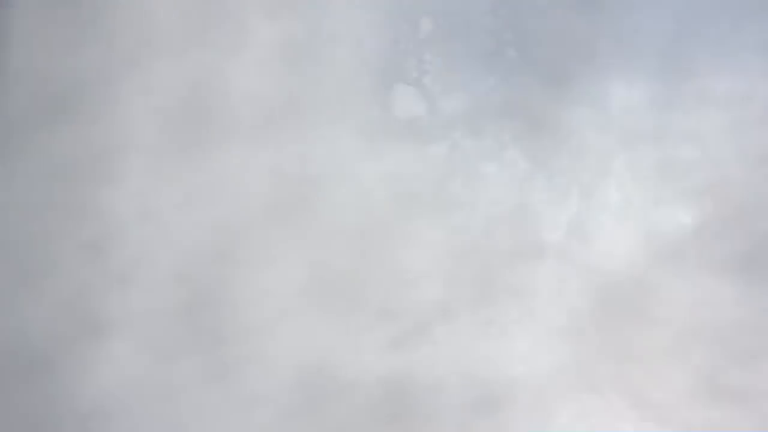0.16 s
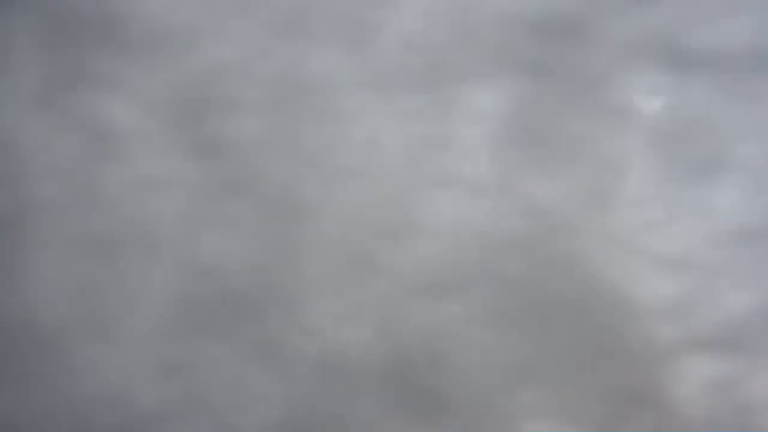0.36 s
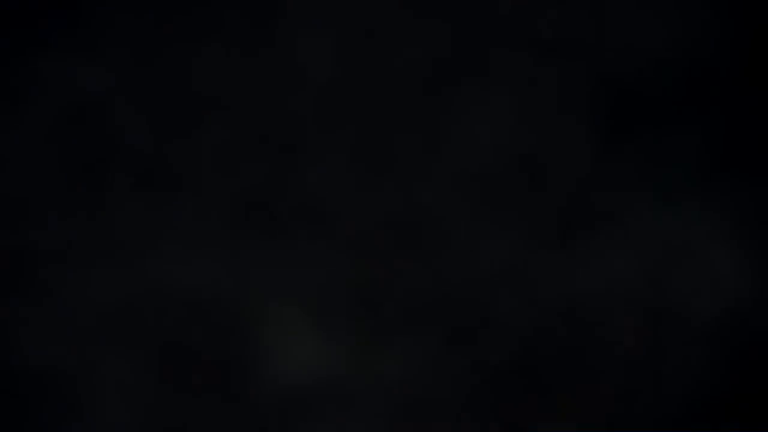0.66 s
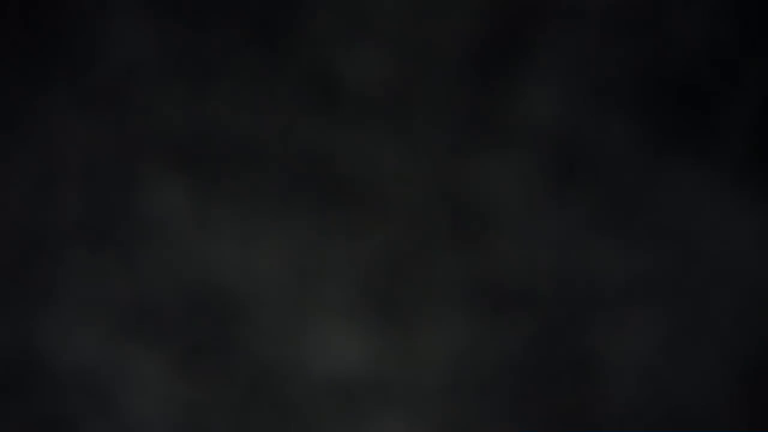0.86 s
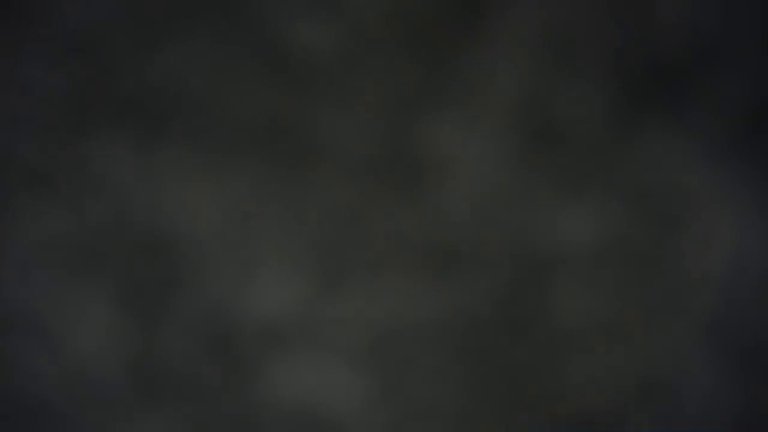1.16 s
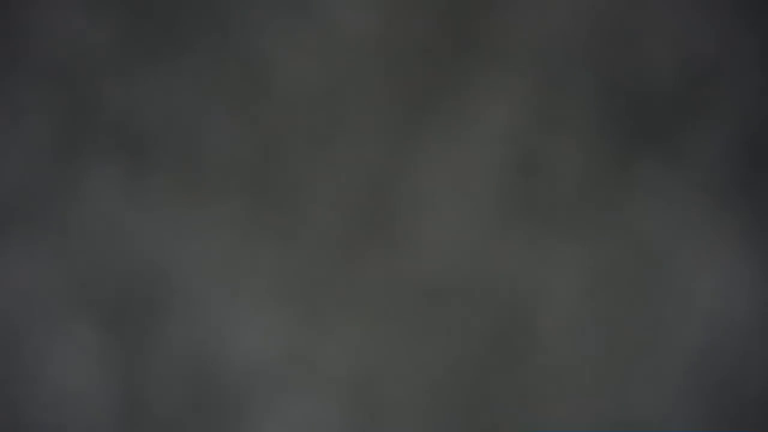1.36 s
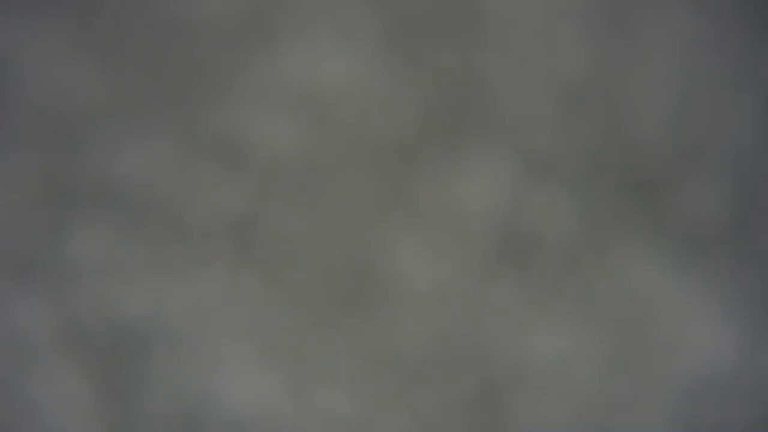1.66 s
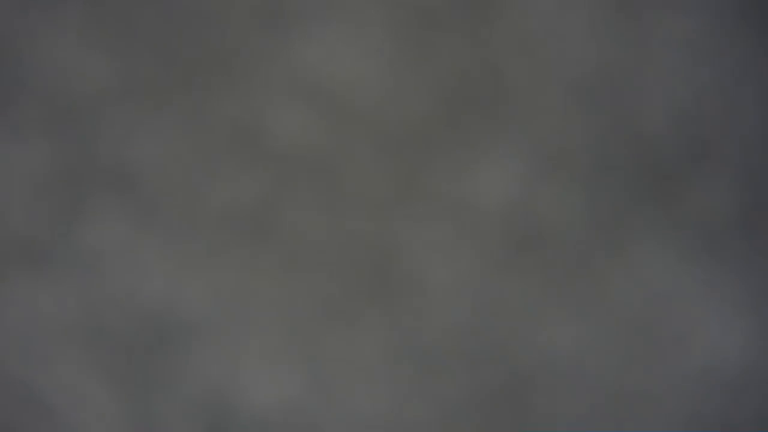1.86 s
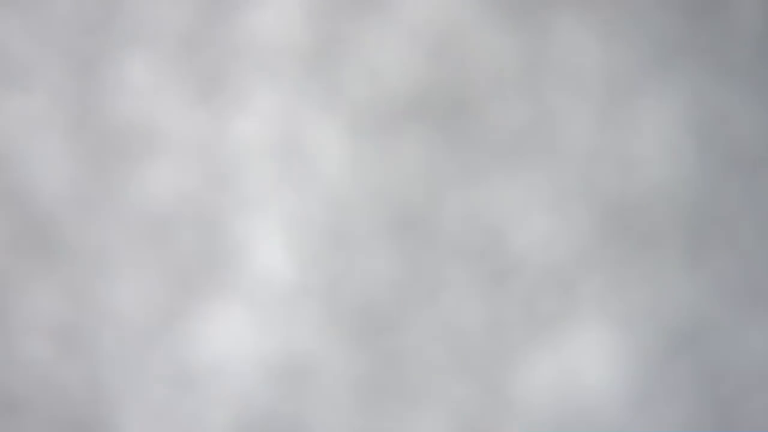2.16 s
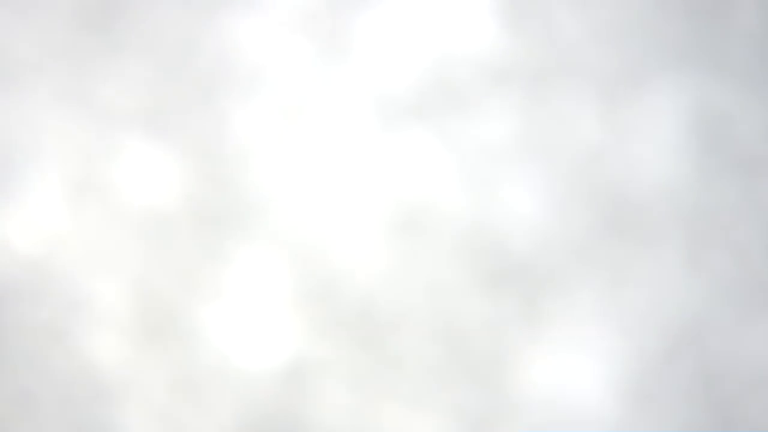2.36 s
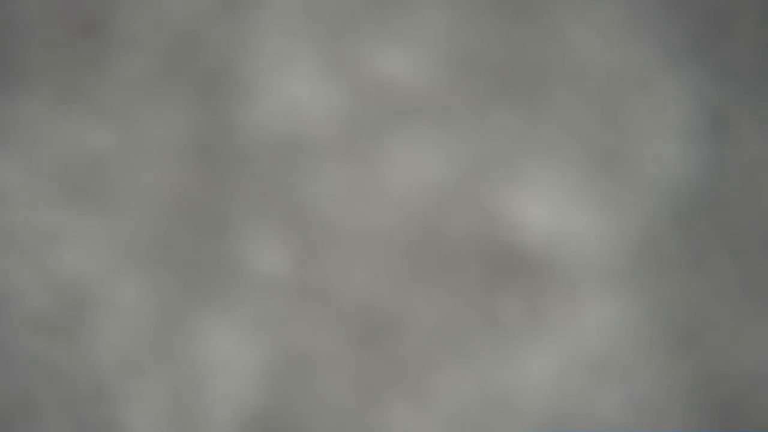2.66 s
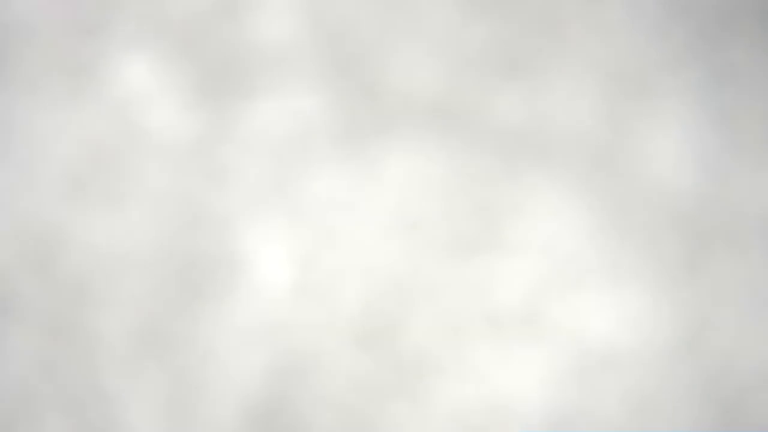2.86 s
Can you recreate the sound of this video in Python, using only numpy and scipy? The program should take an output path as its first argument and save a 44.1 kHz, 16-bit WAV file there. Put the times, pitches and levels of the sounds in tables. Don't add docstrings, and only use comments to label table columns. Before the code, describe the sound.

Snow grinds over a helmet camera's case, millimetres from its microphone. A rising crisp scrape breaks into violent knocks, nearly stops, slides softly and dully, then scratches loudly again with squeaky drags, slowed and slightly stuttering.

```python
import sys
import numpy as np
from scipy import signal
from scipy.fft import rfft, irfft, next_fast_len
from scipy.io import wavfile
from scipy.ndimage import uniform_filter1d, map_coordinates

SR = 44100
rng = np.random.default_rng(int(sys.argv[2]) if len(sys.argv) > 2 else 0)


def undo_db(level):
    steps = np.asarray(level, float) / 20
    return 10 ** steps


def transcribe(u):
    v = np.clip(np.atleast_2d(u).T, -1, 1)
    q = np.round(v * 32767).astype(np.int16)
    wavfile.write(sys.argv[1], SR, q)


N = 132300

# t/s, rubbing level/dB, sharpness/dB
RUB_SURGES = [
    [(0, -51.5, 0.5), (.17, -47.5, -3.5), (.215, -41.5, 3.5), (.27, -38, 3), (.33, -36, 4), (.36, -32, 3),
     (.43, -33.5, 3), (.48, -33, 4)],
    [(.52, -28, 1), (.575, -33.5, -2), (.635, -32, -1.5), (.675, -47.5, -1.5), (.735, -59, -1.5),
     (.772, -37.5, -4), (.803, -42, -2), (.84, -57.5, -6)],
    [(.9, -58, -6), (1.04, -53.5, -6.5), (1.11, -58.5, -8), (1.2, -52, -7), (1.28, -55.5, -11),
     (1.38, -46, -8), (1.56, -44, -7.5), (1.67, -47, -11.5), (1.75, -61, -8)],
    [(1.81, -55, -7.5), (1.86, -58, -3.5), (1.92, -47.5, -9), (1.945, -47, -2), (2.02, -45, -6),
     (2.07, -37, -2), (2.22, -39, -2), (2.28, -40.5, -4.5)],
    [(2.4, -37.5, -0.5), (2.5, -28.5, 1), (2.61, -30.5, 1), (2.7, -27.5, 0.5), (2.78, -39, -1),
     (2.88, -43, 1.5), (2.97, -38, -1), (3, -39, 1)],
]
# t/s, load level/dB, churn level/dB
LOAD_TUMBLES = [
    [(0, -44, -48), (.05, -44, -48), (.17, -41, -48), (.3, -29, -42), (.4, -45, -35), (.49, -36, -45)],
    [(.51, -40, -28), (.57, -40, -27), (.582, -42, -38), (.68, -38, -41.5), (.72, -36, -57),
     (.79, -33, -42), (.85, -35, -58), (.93, -63, -79)],
    [(1, -65, -63.5), (1.28, -55.5, -63), (1.47, -65, -55), (1.7, -53.5, -57.5), (1.83, -43, -57),
     (1.9, -46, -54.5), (2, -55, -48)],
    [(2.07, -51.5, -52.5), (2.145, -47.5, -42), (2.18, -49, -55), (2.4, -42, -52), (2.47, -40, -43.5),
     (2.61, -46, -35.5), (2.7, -43, -35), (2.8, -40, -51), (3, -49, -47.5)],
]
# t/s, peak
# level/dB, swing f/Hz, direction (signed factor)
LUMP_KNOCKS = [(.036, -30, 62, -0.6), (.0415, -30, 58, 1), (.057, -32, 70, -1), (.07, -34, 70, 0.8),
               (.098, -33, 55, 1), (.114, -34, 55, 1), (.133, -35, 55, 1), (.178, -34, 45, -1),
               (.5315, -17, 130, 0.9), (.5712, -13, 200, -1), (2.058, -38, 32, -1), (2.12, -39, 30, 1),
               (.76, -30, 170, 0.6), (.24, -26.5, 26.7, -0.94), (0.285, -29, 46.3, -0.94),
               (0.307, -18.5, 27.8, -1.16), (0.365, -32, 29.6, 1), (.579, -21, 76, 0.9),
               (.592, -18.5, 80, 0.82), (0.648, -23.5, 42, 0.92), (0.739, -29, 49, -1.14),
               (0.352, -17, 116, -0.6), (0.502, -9.5, 107, -0.33), (0.5135, -8.5, 92, -0.62),
               (0.522, -11.5, 66.7, -0.59), (.5392, -12, 125, -0.85), (.5495, -12, 85, -0.8),
               (0.558, -11, 156, 0.65), (0.5632, -6.5, 105, -0.69), (.607, -18, 75, 0.9),
               (0.617, -14, 46.1, 0.76), (.67, -28.5, 69, 1), (.757, -43, 121, -1.4),
               (0.767, -26, 95, -1.8), (.7715, -22, 85, 1), (0.78, -18.5, 46, 0.92),
               (1.135, -48, 29.7, -1.15), (1.906, -27, 22, -0.6), (2.2065, -35, 115, -1.1),
               (2.2168, -35, 115, -1.07), (2.435, -25.5, 27.3, -0.7), (2.657, -28, 38, 0.69),
               (2.679, -30.5, 36, -1.06)]
# t/s, peak level/dB, centre f/Hz, t60/s
ICE_CRACKS = [(.1963, -26, 4900, .015), (.2068, -22, 4950, .015), (.2172, -19, 9000, .012),
              (.2272, -18, 9000, .012), (.2372, -21, 8000, .012), (.2472, -16, 4000, .025),
              (.3008, -16, 9000, .012), (.3115, -8, 6500, .016), (.322, -16, 10000, .012),
              (.3385, -8, 5000, .018), (.3489, -8, 5500, .022), (.358, -13, 6000, .015),
              (.3685, -13, 5000, .025), (.398, -14, 5000, .015), (.466, -13, 4500, .015),
              (.4767, -6, 4600, .016), (.4972, -12, 5010, .018), (.5048, -4, 2500, .032),
              (.5165, 4, 2700, .024), (.527, -9, 2600, .022), (.6034, -16, 3800, .023),
              (.619, -10.5, 2750, .023), (.759, -34, 2730, .023), (.768, -21, 2650, .025),
              (1.9092, -40, 2370, .03), (.5505, -14, 2600, .02), (2.0155, -30, 2070, .03),
              (2.0374, -28, 2360, .025), (2.0554, -24, 1870, .025), (2.0778, -22, 2240, .025),
              (2.433, -18, 1680, .025), (2.4694, -13.5, 1720, .023), (2.661, -14, 8500, .02),
              (2.674, -12, 5000, .02), (2.696, -9, 2600, .02), (2.8635, -25, 2150, .02)]
# t/s,
# length/s, level/dB, f/Hz
WALL_DRAGS = [(.19, 0.14, -36.5, 2200), (1.315, 0.42, -49.5, 1560), (2.26, 0.2, -38, 1700),
              (2.38, 0.22, -30, 1680), (1.925, .05, -51, 4200), (2.88, .12, -42, 2300),
              (.33, .12, -35, 2250), (2.13, .035, -45, 250), (2.195, .04, -45, 330), (2.5, 0.06, -32, 2500),
              (2.58, 0.065, -35, 1170), (2.66, 0.079, -30.5, 2900), (2.3, 0.087, -44.5, 9300),
              (2.47, 0.1, -32, 5600), (.455, 0.035, -28, 4800), (2.57, 0.21, -45, 465),
              (2.03, 0.07, -48, 300), (.58, .075, -42, 430), (2.6, .15, -45, 800), (0.495, .095, -31, 420),
              (.495, .04, -32, 1000), (.52, .065, -29, 300), (.18, .06, -50, 790), (.75, .05, -44, 780),
              (.495, .04, -30, 790), (0, .18, -49, 280), (.35, .05, -33, 5600), (.52, .06, -28, 205),
              (2.66, .06, -36, 5600)]
# f/Hz, width/Hz, level/dB
WALL_MODES = [(1581, 400, 9), (2362, 400, -9.5), (3404, 167, 2)]
# f/Hz, level/dB
RUB_SPECTRUM = [(180, -32), (300, -14), (559, -13.5), (658, -8.5), (1590, -8), (2400, 2.5), (3920, -10),
                (6950, -12.5), (15000, -46)]
# f/Hz, level/dB
GRIT_SPECTRUM = [(1500, -21), (3000, -6.5), (4500, -2), (7000, -4.5), (9000, -8), (12500, -11.5),
                 (15500, -19.5)]
# f/Hz, level/dB
HEAVE_SPECTRUM = [(8, -15.5), (18, -6.5), (32, 2), (60, -14), (120, -31.5)]
# f/Hz, level/dB
CHURN_SPECTRUM = [(40, -8.5), (80, -3), (150, -4.5), (300, -11), (600, -24.5), (1300, -30)]
# f/Hz, width/Hz, depth (0-1)
PORT_DEAD_SPOT = (7840, 570, 0.49)

WALL_DB, GRIT_DB, GRIT_DB_PER_SHARP_DB = -5, 0, 1.64
CHURN_DB, HEAVE_DB, HISS_DB, SIDE_DB = -3, -2, -66, -30
GRAINS_PER_S, GRAIN_SHARE = 6000, .45
SLICE, USUAL_STEP, LEAST_STEP, MOST_STEP = 760, 445, 220, 720
USUAL_SHARE = .55
SWING_CYCLES = .51
OVERTONE, OVERTONE_DB = 3, -13
PUFF_DB, PUFF_T30_S, PUFF_HZ = -16.5, .015, 660
CRACK_DB, CRACK_WIDTH, CRACK_LOW_HZ = -14.5, .85, 1300
CRACK_RISE = .085
DRAG_WIDTH, DRAG_LEAST_HZ = .21, 150
CEILING, TOP_HZ = .78, 15560


def unit(x):
    return x / np.sqrt(np.mean(x ** 2) + 1e-20)


def along(points, hz):
    f, db = np.transpose(points)
    return undo_db(np.interp(np.log(hz + 1), np.log(f + 1), db, -90, -90))


def rings(modes, hz):
    total = 0
    for k, (centre, width, db) in enumerate(modes):
        damping = 1j * hz * width
        total = total + (-1) ** k * undo_db(db) * damping / (centre * centre - hz * hz + damping)
    return total


def filtered(x, response):
    m = next_fast_len(N + 8192)
    return irfft(rfft(x, m) * response(np.fft.rfftfreq(m, 1 / SR)), m)[..., :N]


def steadied(x, size):
    power = np.abs(uniform_filter1d(x ** 2, size)) + 1e-9
    return unit(x / power ** .35)


def curves(tables):
    s, *columns = np.vstack(tables).T
    return [np.interp(np.arange(N) / SR, s, column) for column in columns]


def wobble(rate):
    knots = rng.standard_normal(int(N * rate / SR) + 4)
    return map_coordinates(knots, [np.arange(N) * rate / SR])


def patchy(x, patchy_db):
    z = signal.stft(x, nperseg=512)[2]
    field = uniform_filter1d(rng.standard_normal(z.shape), size=8, axis=0)
    field = uniform_filter1d(field, size=9, axis=1)
    return signal.istft(z * undo_db(patchy_db * unit(field)), nperseg=512)[1][:N]


def slowed(x):
    chance = rng.random((N // SLICE + 2, 2))
    odd_step = LEAST_STEP + chance[:, 1] * (MOST_STEP - LEAST_STEP)
    steps = np.where(chance[:, 0] < USUAL_SHARE, USUAL_STEP, odd_step)
    back = np.cumsum(steps).astype(int)
    n = np.arange(N)
    fade = np.clip(1.4 * (n % SLICE) / SLICE, 0, 1) * np.pi / 2
    leaving = x[..., n - back[n // SLICE]]
    entering = x[..., n - back[n // SLICE + 1]]
    return np.cos(fade) * leaving + np.sin(fade) * entering


def crystals():
    chance = GRAINS_PER_S / SR * undo_db(3 * wobble(90))
    grains = (rng.random(N) < chance) * rng.standard_normal(N)
    return np.sqrt(GRAIN_SHARE) * unit(grains) + np.sqrt(1 - GRAIN_SHARE) * rng.standard_normal(N)


def microphone_hiss():
    noise = rng.standard_normal(N)
    return undo_db(HISS_DB) * unit(filtered(noise, lambda hz: hz / (hz + 60) / (1 + hz / 1500) ** 2))


def wall_drags():
    t, rubbing, out = np.arange(N) / SR, slowed(crystals()), 0
    for s, length, db, pitch in WALL_DRAGS:
        mode = [(pitch, max(DRAG_WIDTH * pitch, DRAG_LEAST_HZ), 0)]
        band = steadied(filtered(rubbing, lambda hz: rings(mode, hz) ** 2), size=1500)
        swell = np.sin(np.pi * np.clip((t - s) / length, 0, 1)) ** 2
        out = out + undo_db(db) * swell * band
    return out


def ice_cracks():
    out, t = np.zeros(N + SR), np.arange(2048) / SR
    f = np.fft.rfftfreq(len(t), 1 / SR)
    low_cut = 1 + (CRACK_LOW_HZ / (f + 1)) ** 6
    for s, db, hz, t60 in ICE_CRACKS:
        band = np.exp(-(np.log((f + 1) / hz) / CRACK_WIDTH) ** 2) / low_cut
        burst = unit(irfft(rfft(rng.standard_normal(len(t))) * band))
        u = t / (CRACK_RISE * t60)
        out[round(s * SR):][:len(t)] += undo_db(db + CRACK_DB) * u * np.exp(1 - u) * burst
    return out[:N]


def lump_knocks():
    swings, puffs, t = np.zeros(N + SR), np.zeros(N + SR), np.arange(SR // 4) / SR
    for s, db, hz, way in LUMP_KNOCKS:
        u = t * hz / SWING_CYCLES
        envelope = u * np.exp((1 - u * u) / 2)
        overtone = undo_db(OVERTONE_DB) * np.sin(2 * np.pi * OVERTONE * hz * t)
        swing = np.sin(2 * np.pi * hz * t) - overtone
        at = round(s * SR)
        swings[at:][:len(t)] += way * undo_db(db) * swing * envelope
        puffs[at:][:len(t)] += undo_db(db + PUFF_DB - 60 * t / PUFF_T30_S / 2) * hz / 100
    air = puffs[:N] * rng.standard_normal(N)
    return swings[:N] + filtered(air, lambda hz: 6 / (1 + 1j * hz / PUFF_HZ) ** 2 * (hz > 150))


def snow_load():
    load_db, churn_db = curves(LOAD_TUMBLES)
    churn = unit(filtered(rng.standard_normal(N), lambda hz: along(CHURN_SPECTRUM, hz)))
    heave = unit(filtered(rng.standard_normal(N), lambda hz: along(HEAVE_SPECTRUM, hz)))
    churn, heave = steadied(churn, size=1800), steadied(heave, size=4000)
    return undo_db(churn_db + CHURN_DB) * churn + undo_db(load_db + HEAVE_DB) * heave


def snow_rasp():
    rub_db, sharp_db = curves(RUB_SURGES)
    rubbing, scratching = slowed(np.array([crystals(), crystals()]))
    flutter_db = .7 * wobble(85)

    def case(hz):
        return along(RUB_SPECTRUM, hz) * (1 + undo_db(WALL_DB) * rings(WALL_MODES, hz))

    body = steadied(filtered(patchy(rubbing, patchy_db=1.5), case), size=1600)
    grit = filtered(patchy(scratching, patchy_db=1.2), lambda hz: along(GRIT_SPECTRUM, hz))
    grit = steadied(grit, size=1600)
    grit_gain = undo_db(GRIT_DB + GRIT_DB_PER_SHARP_DB * sharp_db)
    return undo_db(rub_db + flutter_db) * (body + grit_gain * grit)


def scene():
    rasp = snow_rasp()
    lows = snow_load() + lump_knocks()
    dip_hz, width, depth = PORT_DEAD_SPOT
    highs = filtered(rasp + ice_cracks() + wall_drags(),
                     lambda hz: 1 - depth * np.exp(-((hz - dip_hz) / width) ** 2))
    mid = highs + lows + microphone_hiss()
    side = undo_db(SIDE_DB) * filtered(lows + .5 * rasp, lambda hz: 1j / (1 + hz / 150))
    return np.array([mid + side, mid - side])


def roll_off(x):
    return signal.sosfilt(signal.butter(12, 15740, fs=SR, output="sos"), x)


def record(dry):
    soft = dry / (1 + np.abs(dry / CEILING) ** 4) ** .25
    return roll_off(filtered(soft, lambda hz: hz < TOP_HZ))


dry = scene()
out = record(dry)
transcribe(out)
```